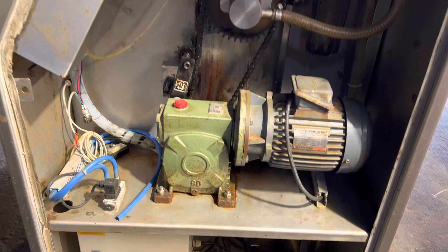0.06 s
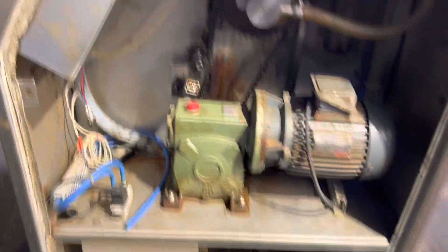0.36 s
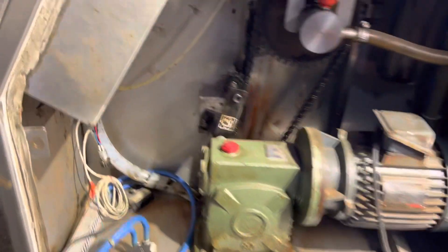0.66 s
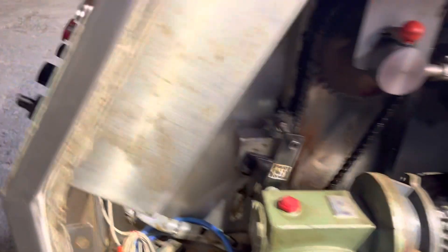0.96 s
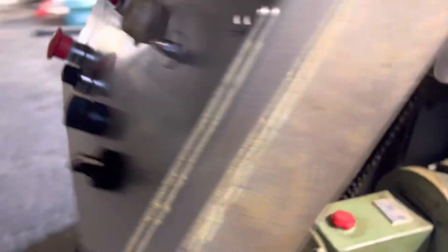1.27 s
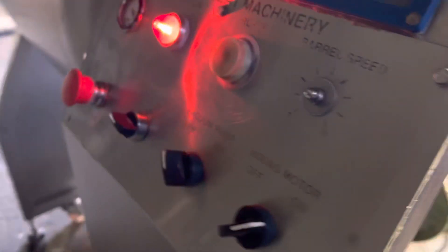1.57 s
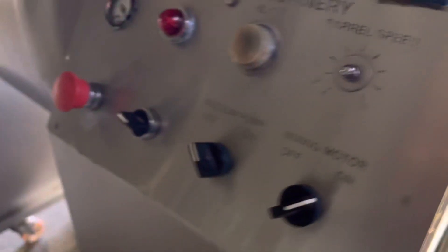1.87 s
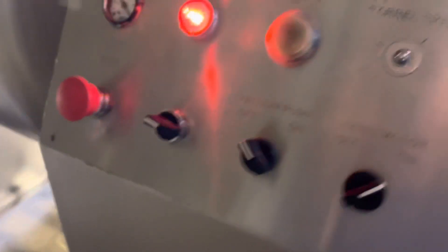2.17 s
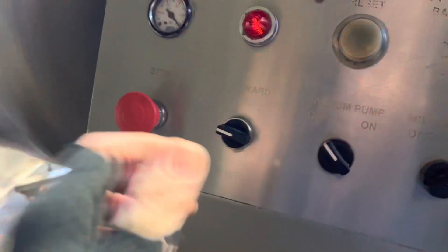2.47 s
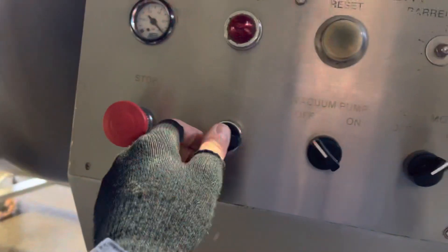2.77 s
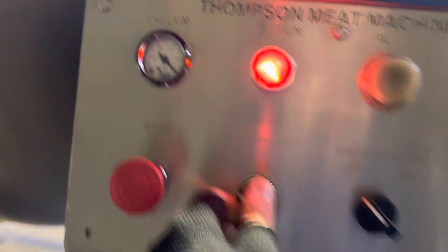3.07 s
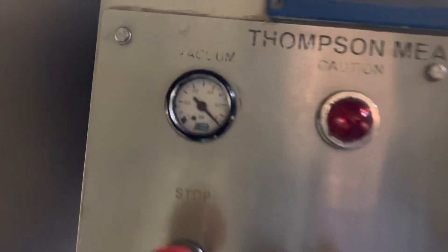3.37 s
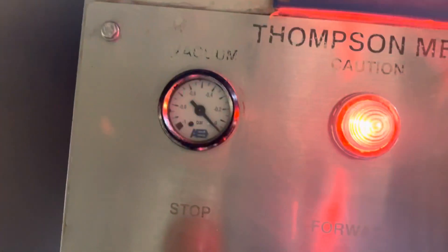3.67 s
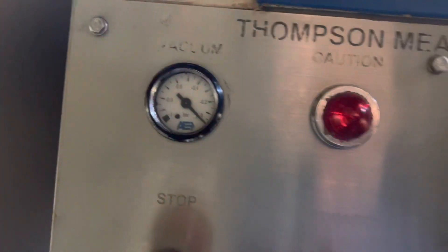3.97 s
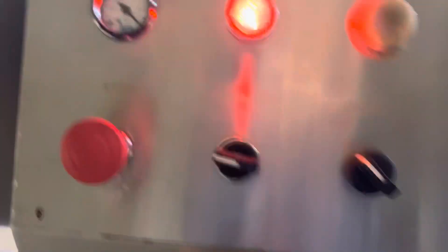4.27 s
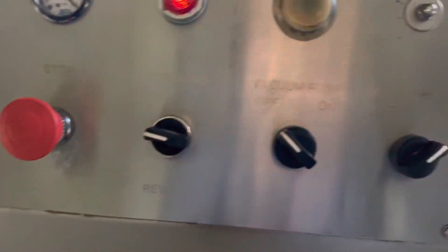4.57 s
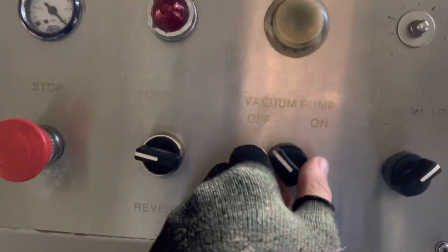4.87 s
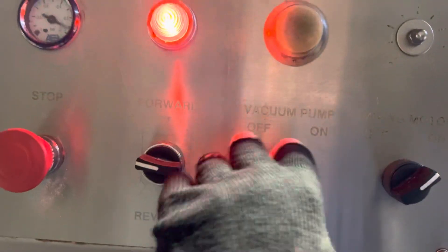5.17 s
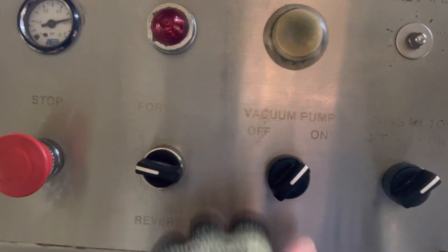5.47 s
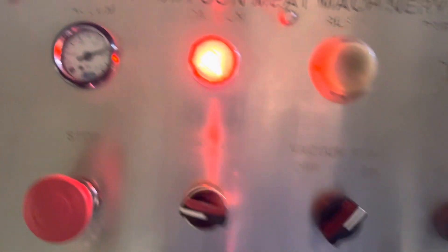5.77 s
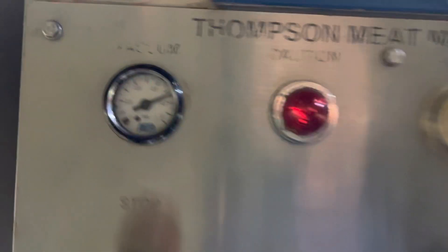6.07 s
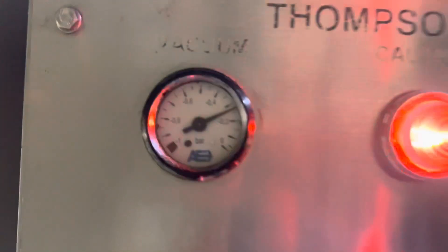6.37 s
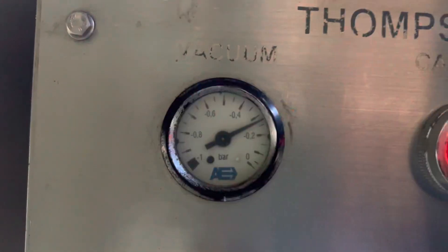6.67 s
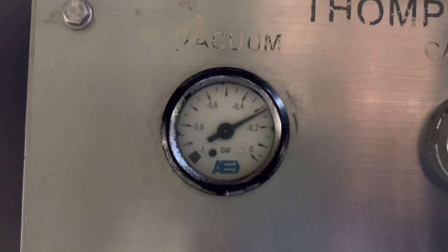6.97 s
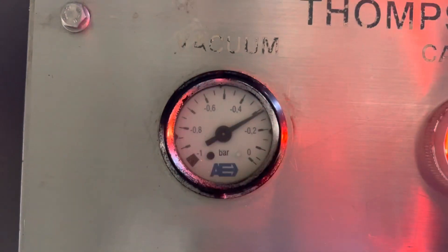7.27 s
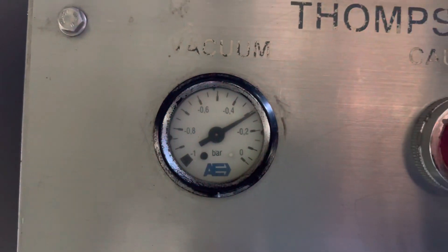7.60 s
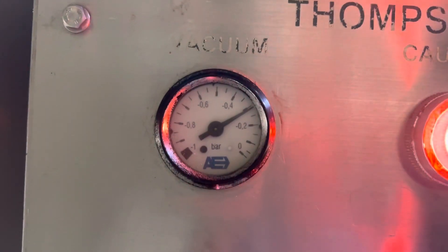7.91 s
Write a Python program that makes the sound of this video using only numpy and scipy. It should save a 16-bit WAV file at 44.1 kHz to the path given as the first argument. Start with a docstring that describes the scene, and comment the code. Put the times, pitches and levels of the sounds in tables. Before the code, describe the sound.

From the start, an electric motor gives a thin, very high whine over the hum and rumble of a gearbox, heard close to the open bay of a steel machine. Soft knocks from the chain and drum come between about 0.6 and 1.8 seconds. By 2 seconds the whine has faded well back as the microphone moves to the control panel, while the low hum carries on. A glove scrapes faintly around 2.5 seconds, followed by a light handling tap and quiet sleeve swishes. Just before 5 seconds a rotary switch ticks, then snaps over sharply at about 5.1 as a vacuum pump starts with a thump that shakes the cabinet. The pump churns and hisses, its bright rasp jumping in level near 5.8 seconds. From about 6.3 it holds a loud rasping drone with a slight squeal until the end, near 8 seconds.

```python
"""A phone's two microphones, carried from the open drive bay of a steel vacuum tumbler to its panel.
Close to the bay, the inverter-fed motor whines near 9 kHz over the hum and knocks of gearbox and chain.
By 2 s the door screens the whine; a glove scrapes and a sleeve swishes as the arm comes up.
Around 5 s, at the panel, a rotary switch clicks over and a vane pump starts with a jolt.
Its puffs ring the housing and build to a loud rasping drone as the vacuum takes hold."""
import sys
import numpy as np
from scipy import signal
from scipy.fft import rfft, irfft, next_fast_len
from scipy.io import wavfile
from scipy.ndimage import uniform_filter1d

SR = 44100
rng = np.random.default_rng(int(sys.argv[2]) if len(sys.argv) > 2 else 0)


def wav_record(signal):
    """Record a signal, one row per channel, as 16-bit PCM in the file named by sys.argv[1]."""
    frames = np.transpose(np.atleast_2d(signal))
    bounded = np.clip(frames, -1, 1)
    # unit amplitude maps onto the largest positive 16-bit level
    quanta = np.round(bounded * 32767).astype(np.int16)
    wavfile.write(sys.argv[1], SR, quanta)


N = 350154
T = np.arange(N) / SR
SIZE = 2 * next_fast_len(N // 2 + 1, True)
FREQ = np.maximum(np.arange(SIZE // 2 + 1) * SR / SIZE, 1)
PUMP_START_S, VANE_HZ = 5.1, 143.6

# How alike the two microphones hear the room. Each row: frequency in Hz, likeness (clipped to -1..1).
MIC_LIKENESS = [(60, 0.89), (150, 0.92), (300, 0.82), (640, 0.17), (1400, -0.05), (6000, 0.38),
                (7100, 0.63), (8200, 0.56), (9500, -1.11), (11000, -1.07), (11800, 0.058), (12500, .92),
                (14300, .92), (15700, -.6)]
# Their lean to the operator's side. Each row: frequency in Hz, left minus right in dB before scaling.
MIC_BIAS = [(300, -.4), (1200, -1.5), (2300, -1.5), (3400, 3), (5000, 9.5), (6400, 2), (8000, -2)]

# Gearbox rumble, gear noise, air and bearing rush, and inverter whine along the walk from the bay.
# Each row: time in seconds, level in dB.
RUMBLE_LEVEL = [(0, -58), (.35, -54), (1.1, -42.5), (1.7, -45), (3.3, -46.5), (5.0, -55.5)]
GEAR_LEVEL = [(0, -58), (.8, -54), (1.3, -52.5), (1.8, -51), (2.4, -52.5), (3.1, -53.5), (3.7, -55),
              (4.3, -54), (5.0, -57)]
RUSH_LEVEL = [(0, -55.5), (.85, -53.5), (1.3, -55.5), (1.8, -59.5), (2.3, -61.5), (3.0, -62.5), (3.6, -67),
              (5.0, -62)]
WHINE_LEVEL = [(0, -50.5), (.45, -45.5), (.7, -40.5), (1.1, -43), (1.75, -51), (2.05, -58.5), (4.8, -61),
               (7.94, -59)]
# Spectra of rumble, gears, rush, the narrow noise around the whine, and the motor's broad hiss.
# Each row: frequency in Hz, relative level in dB.
RUMBLE_SPECTRUM = [(15, -45), (25, -14), (46, 2.5), (59, 3), (135, -0.5), (167, 4), (227, -9), (260, -6.5),
                   (340, -48), (570, -120)]
GEAR_SPECTRUM = [(120, -30), (200, -5.5), (286, 2), (323, -8.5), (352, -8), (588, -6.5), (618, -8.5),
                 (636, -16.5), (760, -15), (990, -21.5), (1670, -120)]
RUSH_SPECTRUM = [(350, -12.5), (600, -12), (640, -8.5), (770, -14.5), (867, -8.5), (1020, -10.5),
                 (1740, -11), (1910, -14), (2920, -19.5), (3510, -25), (3870, -22), (5530, -29),
                 (8000, -22), (10400, -32), (12000, -29.5), (15500, -27.5)]
SKIRT_SPECTRUM = [(7000, -18), (8300, 1), (8950, 19), (9250, 8), (9600, -8), (10200, -27)]
MOTOR_HISS_SPECTRUM = [(4000, -8.5), (7000, -6), (8300, 1.5), (9000, 6), (9700, 2), (10300, -15),
                       (11300, -12), (13000, -17), (14500, -13), (15700, -5)]
# Motor and gearbox tones. Each row: pitch in Hz, level in dB at the bay, by the door, at the panel.
HUM_TONES = [(65.6, -53.5, -42.5, -59.5), (90.9, -56.5, -57, -58.5), (107.7, -51.5, -48.5, -61),
             (123.8, -56, -46, -60.5), (142.5, -52.5, -55, -61.5), (174.9, -51.5, -50.5, -61.5),
             (191.7, -52, -51.5, -57), (285.7, -56.5, -57.5, -59.5), (301.4, -70, -70, -60.5),
             (532.6, -57, -63, -72.5), (548.5, -56, -66, -86), (583, -56, -66, -66),
             (601.3, -60, -56.5, -64.5), (884, -77, -58.5, -77.5), (1144, -73, -83, -81.5),
             (1439, -70, -65, -76), (1725, -70, -77, -87), (1817, -72, -72, -78.5)]
# Resonances of the gearbox casing and bay. Each row: frequency in Hz, half-width in Hz,
# relative level in dB, time in seconds when the door starts to screen it.
CASING_MODES = [(1165, 25, -10, 0.83), (1300, 44, -6.5, 1.1), (1420, 60, -7, 1.2), (1535, 32, -5.5, 0.92),
                (1693, 19, 0.5, 0.93), (1800, 20, -10.5, 0.94), (2440, 130, -9.5, 1.7),
                (2890, 56, -7, 1.47), (3830, 130, -10.5, 1.4)]
# The inverter's switching sidebands. Each row: pitch in Hz, relative dB at the bay and at the panel.
SIDEBANDS = [(7812, -30, -32), (8010, -26.5, -29), (8267, -21, -26), (8387, -22, -26), (8480, -20, -22),
             (8551, -19, -17), (8709, -17, -17), (8769, -10, -9), (8870, 3.5, 6), (8958, -5, -6),
             (9056, -7, -11), (9155, 5, 3), (9250, -16, -16), (9312, -16, -26), (9440, -23, -28),
             (9535, -18, -27)]
# The microphones' path through the standing waves. Each row: time in seconds, distance in metres.
MIC_TRAVEL = [(0, .015), (.4, .0285), (.66, .037), (1.0, .075), (2.0, .078), (2.33, .133), (2.75, .137),
              (3.04, .152), (3.39, .19), (3.92, .193), (4.17, .228), (4.42, .247), (5.15, .266),
              (5.66, .267), (6.36, .342), (7.94, .346)]

# Fingers on the phone's case, right at the microphones. Each row: start in seconds, level in dB.
TAPS = [(.27, -42), (2.8172, -44)]
# Modes of that case. Each row: frequency in Hz, relative level in dB, 60 dB decay in seconds.
CASE_MODES = [(860, 0, .03), (1330, -9, .02)]
# Knocks of drum and chain.
# Each row: start in seconds, level in dB, treble cutoff in Hz, 60 dB decay in seconds.
KNOCKS = [(.635, -43.5, 600, 0.32), (.805, -48, 2500, 0.073), (.825, -40, 3500, 0.11),
          (1.036, -39.5, 2900, 0.15), (1.266, -45, 1800, .1), (1.643, -43, 2500, 0.15),
          (1.675, -44.5, 1200, 0.24), (1.78, -53, 1500, 0.093), (6.07, -42, 300, 0.31),
          (6.64, -37, 330, 0.25)]
# Spectrum of a knock or rattle before it is dulled. Each row: frequency in Hz, relative level in dB.
KNOCK_SPECTRUM = [(200, 4), (300, -1), (600, -9), (1200, -8.5), (2500, -17), (6000, -18)]
# Close passes by the booming cabinet. Each row: middle and half length in seconds, boost in dB.
BOOM_SWELLS = [(1.25, 0.21, 8), (3.298, 0.15, 7), (3.79, 0.24, 14)]

# Resonances of the glove's scrape. Each row: frequency in Hz, half-width in Hz, relative level in dB.
SCRAPE_BANDS = [(1250, 300, -2), (1780, 260, -4), (3100, 480, 0), (3950, 400, -4), (5800, 900, -10)]
# Arm movements. Each row: middle and half length in seconds, swish level in dB, hiss level in dB.
SWISHES = [(2.545, 0.09, -62, -64), (2.66, 0.15, -71, -65.5), (3.073, 0.21, -67.5, -71.5),
           (4.212, 0.16, -59, -65), (4.686, 0.11, -57, -61.5), (4.776, 0.067, -66.5, -60),
           (5.788, 0.14, -50, -55.5)]
# Spectra of the sleeve's swish and hiss. Each row: frequency in Hz, relative level in dB.
SWISH_SPECTRUM = [(500, -10), (900, 4), (1400, 3.5), (1780, 0.5), (2100, -2.5), (3000, -3), (3500, -1.5),
                  (3950, -1), (4400, -2.5), (6500, -7.5), (9000, -29), (15000, -77)]
SLEEVE_HISS_SPECTRUM = [(5000, -9), (8000, -1), (10300, 1), (11700, 5.5), (13500, -2), (14500, -1),
                        (15700, 2)]
# Ticks as the hand lets go of a knob. Each row: start in seconds, level in dB.
TICKS = [(3.206, -67), (3.448, -60)]
# Resonances of a tick. Each row: frequency in Hz, half-width in Hz, relative level in dB.
TICK_BANDS = [(5600, 700, 2), (7200, 900, -5)]
# Switch clicks. Each row: start in seconds, level in dB, the snap's offset in dB before its trim.
CLICKS = [(4.9405, -43, -10), (4.9472, -32, -15), (4.9857, -37.5, -6), (4.9924, -26.5, -28),
          (5.1395, -9, -9.5)]
# Modes of the switch knob. Each row: frequency in Hz, relative level in dB, 60 dB decay in seconds.
KNOB_MODES = [(1390, -7.5, 0.014), (2044, 6.5, 0.0073), (2390, -3, 0.0073), (7000, -36, 0.024)]
# Spectrum of the contacts' snap. Each row: frequency in Hz, relative level in dB.
SNAP_SPECTRUM = [(500, 9), (2500, 8.5), (4500, 4), (7500, 5.5), (10300, 3), (12500, 1), (15500, 11)]

# Jolts of the starting pump motor. Each row: start in seconds, level in dB.
JOLTS = [(5.101, -20.5), (5.1255, -20), (5.203, -31), (5.31, -36)]
# Modes of the steel cabinet. Each row: frequency in Hz, relative level in dB, 60 dB decay in seconds.
CABINET_MODES = [(61.5, -5, 0.4), (92.5, -3, 0.59), (123, 5, 0.14), (129, 0, 0.17), (216, -12.5, 0.49),
                 (368, -14, 0.11), (736, -17.5, 0.12)]
# Resonances of the pump housing, each loudest at its own stage of the vacuum.
# Each row: frequency in Hz, half-width in Hz, relative level in dB, loudest moment in seconds.
HOUSING_MODES = [(2211, 14, -9, 7.35), (2195, 106, -10.5, 6.47), (2285, 25, -12.5, 6.3),
                 (2410, 40, -11.5, 6.8), (2578, 37, -1.5, 6.97), (2616, 100, -1, 5.52),
                 (2660, 27, -2, 6.26), (2740, 66, -4, 6.86), (2968, 42, 0, 7.36), (3080, 51, 3, 7.73),
                 (3028, 60, -1, 6.63), (3136, 49, -1.5, 6.7), (3315, 65, -7, 6.4), (3390, 34, -4, 6.3),
                 (3440, 49, -7.5, 6.1), (3640, 90, -16, 6.2), (3820, 50, -11.5, 6.93)]
# The rasp leaps as the vacuum takes hold. Each row: time in seconds, level in dB.
RASP_LEVEL = [(5.22, -54.5), (5.45, -45), (5.71, -45.5), (5.85, -36), (6.04, -37), (6.26, -32.5),
              (7.0, -32), (7.42, -32), (7.6, -34), (7.94, -33)]
# The rasp's balance at the microphones. Each row: frequency in Hz, left minus right in dB.
RASP_PAN = [(2200, -2.5), (2600, -2.2), (2800, -1), (3050, 1.5), (3400, 8), (3800, 9)]
# Its delay at the right microphone. Each row: frequency in Hz, lag in milliseconds.
RASP_LAG = [(2200, -0.015), (2600, .05), (2800, 0.045), (3000, 0.093), (3800, 0.086)]
# The pump's upper resonances. Each row: frequency in Hz, half-width in Hz, relative level in dB.
OVERTONE_BANDS = [(4256, 28, 0.5), (5100, 48, 5), (5630, 45, -3.5), (5990, 50, -6), (6490, 67, 1),
                  (6880, 130, -11), (7250, 120, -4.5), (8150, 61, -7.5)]
# Spectra of the pump's churn and air hiss. Each row: frequency in Hz, relative level in dB.
CHURN_SPECTRUM = [(30, -1), (50, 11), (110, 0.5), (180, 5), (270, 8.5), (400, 1), (530, 0.5), (610, 4.5),
                  (700, -0.5), (980, 3), (1270, -1.5), (1450, 4.5), (1640, 0), (1900, 2.5), (2400, 0),
                  (3500, -5.5), (4200, -11.5), (8000, -29)]
PUMP_HISS_SPECTRUM = [(5000, 8.5), (8500, 10.5), (10000, 3), (12000, 8.2), (14500, 7.6), (15700, 13.5)]
# The pump's drone. Each row: multiple of the vane rate, level in dB.
VANE_TONES = [(1, -53), (2, -58), (3, -59), (4, -56.5)]
# The exhaust's whistle. Each row: frequency in Hz, half-width in Hz, relative level in dB.
EXHAUST_BANDS = [(3426, 30, -3.5), (3788, 19, 1.5), (3865, 12, -2)]


def undb(db):
    """Decibels to gain."""
    return 10 ** (np.asarray(db) / 20)


def unit(x):
    """Scale to rms 1."""
    return x / np.sqrt(np.mean(x ** 2))


def curve(points):
    """Join (seconds, value) points at every sample."""
    return np.interp(T, *np.transpose(points))


def across(points):
    """Join (Hz, value) points on a log-frequency axis."""
    hz, value = np.transpose(points)
    return np.interp(np.log(FREQ), np.log(hz), value)


def colour(points):
    """Gain of a spectrum that falls steeply beyond its ends."""
    low_hz, high_hz = points[0][0], points[-1][0]
    return undb(across(points)) / (1 + (low_hz / FREQ) ** 8) / (1 + (FREQ / high_hz) ** 12)


def resonances(bands):
    """Gain of a set of steep-sided resonances."""
    power = sum(undb(2 * db) / (1 + ((FREQ - hz) / width) ** 2) ** 2 for hz, width, db in bands)
    return np.sqrt(power)


def noise(gain):
    """Random noise with the given gain at each frequency."""
    return irfft(gain * (rng.standard_normal(len(FREQ)) + 1j * rng.standard_normal(len(FREQ))))[:N]


def resonant_noise(bands):
    """Noise of rms 1 ringing in the given resonances."""
    return unit(noise(resonances(bands)))


def drift(rate_hz):
    """Smooth random drift with a spread of about 1."""
    steps = rng.standard_normal(4096)
    return 1.2 * np.interp(T * rate_hz * 2, np.arange(len(steps)), steps)


def tone(hz, scatter, rate_hz):
    """A tone of rms 1 whose reflections add up differently as things move."""
    phase = 2 * np.pi * (np.cumsum(hz * np.ones(N)) / SR + rng.random())
    in_phase = (1 + scatter * drift(rate_hz)) * np.cos(phase)
    return unit(in_phase + scatter * drift(rate_hz) * np.sin(phase))


def ring(modes, start, rise):
    """Decaying modes after a push that builds up over rise seconds."""
    first = int(np.ceil(start * SR))
    t = np.maximum(T[:SR] + first / SR - start, 0)
    ringing = sum(undb(db - 60 * t / t60) * np.sin(2 * np.pi * hz * t) for hz, db, t60 in modes)
    out = np.zeros(N)
    out[first:first + SR] = ringing * (1 - np.exp(-(t / rise) ** 2))
    return out


def burst(start, t60):
    """An envelope that jumps up and falls 60 dB in t60 seconds."""
    return (T >= start) * undb(-60 * np.maximum(T - start, 0) / t60)


def bump(start, t60, rise):
    """An envelope that swells over rise seconds and dies away."""
    return burst(start, t60) * np.clip((T - start) / rise, 0, 1)


def swell(middle_s, half_s):
    """A bell-shaped envelope that peaks at 1."""
    return np.exp(-((T - middle_s) / half_s) ** 2)


def settle(start, from_db, to_db, lag_s):
    """A level that holds until start, then closes in exponentially on to_db."""
    return to_db + (from_db - to_db) * np.exp(-np.maximum(T - start, 0) / lag_s)


def diffuse(gain, bias=0.67):
    """Normalised noise from all round; the microphones agree in the bass, only in places higher up."""
    likeness = np.clip(across(MIC_LIKENESS), -1, 1)
    mid, side = noise(gain * np.sqrt(1 + likeness)), noise(gain * np.sqrt(1 - likeness))
    lean = undb(np.outer([.5, -.5], bias * across(MIC_BIAS)))
    lean /= np.sqrt(np.mean(lean ** 2, axis=0))
    return irfft(rfft([mid + side, mid - side], SIZE) * lean)[:, :N] / np.std(mid)


def place(x, lag_ms, pan_db):
    """Direct sound; positive values make it later and softer at the right microphone."""
    bins = rfft(x, SIZE)
    late = bins * np.exp(-2j * np.pi * FREQ * lag_ms / 1000)
    return np.array([irfft(bins * undb(pan_db / 2))[:N], irfft(late * undb(-pan_db / 2))[:N]])


def room(x, t60):
    """Dense reflections from steel and concrete, different at each microphone."""
    t = T[:SR // 2]
    tail = rng.standard_normal((2, len(t))) * undb(-60 * t / t60) * (t > .003)
    return signal.fftconvolve(x[None], tail / np.sqrt(np.sum(tail[0] ** 2)), axes=1)[:, :N]


def drive(chain_hz=4.85, link_s=3.0, chain_db=-54, boom_db=-55):
    """Gearbox rumble and hum from the open bay; the chain grumbles as each link seats on the sprocket."""
    passing_s = [.74, 1.12, 2.1]  # at the bay, by the door, at the panel
    hum = sum(undb(np.interp(T, passing_s, levels)) * tone(hz, scatter=0.43, rate_hz=3 + hz / 200)
              for hz, *levels in HUM_TONES)
    seating = (.5 + .5 * np.cos(2 * np.pi * chain_hz * (T - link_s))) ** 2
    grumble = diffuse(resonances([(346, 26, -0.13), (465, 45, -1.4)]))
    chain = grumble * seating * undb(chain_db + 1.5 * drift(4))
    rumble = diffuse(colour(RUMBLE_SPECTRUM)) * undb(curve(RUMBLE_LEVEL) - 1)
    close_db = sum(db * swell(middle, half) for middle, half, db in BOOM_SWELLS)
    boom = diffuse(resonances([(160.3, 6.9, 0)])) * undb(boom_db + close_db)
    gears = diffuse(colour(GEAR_SPECTRUM)) * undb(curve(GEAR_LEVEL) + 1.5)
    rush = diffuse(colour(RUSH_SPECTRUM)) * undb(curve(RUSH_LEVEL) + 0.81 * drift(12))
    return hum + chain + rumble + boom + gears + rush


def gear_casing(level_db=-59, echo_db=-5, screened_db=-17, throb_hz=4.4, throb_db=0.5, grit_db=1.36):
    """The casing rings with the gritty mesh and throbs with the chain, fading behind the door."""
    waver_db = throb_db * np.cos(2 * np.pi * throb_hz * T) + grit_db * drift(35)
    casing = sum(resonant_noise([(hz, width, 0)]) * undb(settle(start, db, db + screened_db, lag_s=0.39))
                 for hz, width, db, start in CASING_MODES)
    direct = place(casing, lag_ms=0.082, pan_db=-1.5)
    echo = room(casing, t60=0.033) * undb(echo_db)
    return (direct + echo) * undb(level_db + waver_db)


def standing_wave(reflection=.45, node_spacing_m=.019):
    """The whine meets its reflection off the steel, so it fades and swells as the microphones move."""
    phase = 2 * np.pi * curve(MIC_TRAVEL) / node_spacing_m
    return unit(np.abs(1 + reflection * np.exp(1j * phase)))


def inverter(tone_db=5, hiss_db=-17, motor_distance_m=0.194, sound_m_s=343):
    """The motor windings sing at the switching sidebands, a touch sharp on approach, flat on leaving."""
    level = undb(curve(WHINE_LEVEL))
    screened = np.interp(T, [1.3, 2.0], [0, 1])  # the door comes between motor and microphones
    # level goes as 1 / distance, so its slope gives the speed of approach
    approach_m_s = motor_distance_m * uniform_filter1d(np.gradient(np.log(level)) * SR, size=SR // 4)
    doppler = 1 + approach_m_s / sound_m_s + 0.00019 * drift(3)
    whine = unit(sum(undb(bay + (panel - bay) * screened) * tone(hz * doppler, scatter=0.18, rate_hz=4)
                     for hz, bay, panel in SIDEBANDS))
    skirt = unit(noise(colour(SKIRT_SPECTRUM))) * undb(-9 - 6 * screened)
    direct = place(undb(tone_db) * whine + skirt, lag_ms=0.038, pan_db=0)
    hiss = diffuse(colour(MOTOR_HISS_SPECTRUM)) * undb(hiss_db)
    return (direct * standing_wave() + hiss) * level


def case_taps():
    """Handling noise: a finger bumps the phone's case and pushes the two microphones opposite ways."""
    taps = sum(undb(db) * ring(CASE_MODES, start, rise=.0005) for start, db in TAPS)
    return np.array([taps, -taps])


def drum_knocks():
    """The drum and its chain bump softly now and then."""
    knocks = 0
    for start, db, cutoff_hz, t60 in KNOCKS:
        thud = diffuse(colour(KNOCK_SPECTRUM) / (1 + (FREQ / cutoff_hz) ** 2))
        knocks += thud * bump(start, t60, rise=0.0046) * undb(db)
    return knocks


def glove(start=2.435, level_db=-56, grit_db=2):
    """The knitted glove catches on the cuff and scrapes free with a gritty flutter."""
    scrape = diffuse(resonances(SCRAPE_BANDS)) * bump(start, t60=0.47, rise=0.018)
    return scrape * undb(level_db + grit_db * drift(110))


def sleeve():
    """Within arm's reach of the microphones, cloth slides over cloth at each movement."""
    swish_level, hiss_level = 0, 0
    for middle, half, swish_db, hiss_db in SWISHES:
        speed = swell(middle, half)
        swish_level += speed * undb(swish_db)
        hiss_level += speed * undb(hiss_db)
    swish = swish_level * diffuse(colour(SWISH_SPECTRUM), bias=1.4)
    hiss = hiss_level * diffuse(colour(SLEEVE_HISS_SPECTRUM))
    return (swish + hiss) * undb(drift(40))


def finger_ticks():
    """A finger slips off a knob with a tiny bright tick."""
    return diffuse(resonances(TICK_BANDS)) * sum(undb(db) * burst(s, t60=.015) for s, db in TICKS)


def switch(snap_trim_db=-7, knob_room_db=-18, snap_room_db=-10):
    """At the panel, to the right, the cam ticks along and snaps over; the plastic knob rings briefly."""
    knob, snap_level = 0, 0
    for start, db, snap_db in CLICKS:
        knob += undb(db) * ring(KNOB_MODES, start, rise=0.00065)
        decay = burst(start, t60=0.0062) + undb(snap_room_db) * burst(start, t60=0.098)
        snap_level += undb(db + snap_db + snap_trim_db) * decay
    echo = room(knob, t60=0.11) * undb(knob_room_db)
    return place(knob, lag_ms=0, pan_db=-6) + echo + snap_level * diffuse(colour(SNAP_SPECTRUM))


def jolt(shudder_db=-31, rattle_db=-37, dull_hz=1300):
    """The pump's starting torque shakes the cabinet, and its loose panels shudder on."""
    boom = sum(undb(db) * ring(CABINET_MODES, start, rise=0.0095) for start, db in JOLTS)
    shudder = diffuse(resonances([(hz, hz / 5, db) for hz, db, _ in CABINET_MODES]))
    shudder *= bump(5.11, t60=1.0, rise=0.014) * undb(shudder_db)
    rattle = diffuse(colour(KNOCK_SPECTRUM) / np.hypot(1, FREQ / dull_hz) ** .5)
    rattle *= bump(5.098, t60=0.46, rise=0.0097) * undb(rattle_db)
    return place(boom, lag_ms=-0.36, pan_db=0) + shudder + rattle


def pump_housing(stage_half_s=0.67, off_stage_db=-7.5, waver_db=.6):
    """The housing's ring at a steady level; its resonances take turns as the vacuum builds."""
    rings, power = 0, 0
    for hz, width, db, loudest_s in HOUSING_MODES:
        off_stage = 1 - swell(loudest_s, stage_half_s)
        gain = undb(db + off_stage_db * off_stage + waver_db * drift(5))
        rings += resonant_noise([(hz, width, 0)]) * gain
        power += gain ** 2
    return rings / np.sqrt(power)


def pump(sag_hz_per_s=.1, puff_depth=0.05, flutter_db=0.8, squeal_db=-36, echo_db=-8, boom_db=-50):
    """Heard from the panel, each vane's puff rings the housing; the rasp grows as the vacuum builds."""
    running = np.clip((T - PUMP_START_S) / 0.022, 0, 1)
    spin_up = 1 - burst(PUMP_START_S, t60=.25)
    loaded_hz = VANE_HZ - sag_hz_per_s * (T - PUMP_START_S)  # the growing load slows the pump
    vane_hz = loaded_hz * spin_up * (1 + 0.00046 * drift(5.1))
    vane_phase = 2 * np.pi * np.cumsum(vane_hz) / SR
    puffs = (1 + puff_depth * np.cos(vane_phase)) * undb(flutter_db * drift(57))
    rasp_db = curve(RASP_LEVEL)
    rasp = unit(pump_housing() * puffs) * undb(rasp_db + 1)
    # the vane tips start to squeal once the vacuum is high
    squealing = np.clip((T - 5.95) / 1.33, 0, 1)
    squeal = tone(21 * vane_hz, scatter=0.45, rate_hz=14) * undb(squeal_db) * squealing
    churn_db = settle(PUMP_START_S, from_db=-50.5, to_db=-42.5, lag_s=0.25)
    overtone_db = 0.84 * churn_db + 0.16 * rasp_db - 12.2
    overtones = unit(noise(resonances(OVERTONE_BANDS)) * puffs) * undb(overtone_db)
    direct = place(rasp + squeal, across(RASP_LAG), across(RASP_PAN))
    direct += place(overtones, lag_ms=0.042, pan_db=6)
    # the walls return the same ring with the puffs smoothed out
    echo = room(rasp + overtones, t60=0.34) * undb(echo_db)
    churn = diffuse(colour(CHURN_SPECTRUM), bias=0.6) * undb(churn_db)
    boom = diffuse(resonances([(163.0, 9.6, 0)])) * undb(boom_db)
    hiss_db = settle(PUMP_START_S, from_db=-57, to_db=-59, lag_s=0.12)
    thin_air_db = -3.2 * np.maximum(T - 6.7, 0)  # the hiss eases once the air thins
    hiss = diffuse(colour(PUMP_HISS_SPECTRUM), bias=1.1) * undb(hiss_db + thin_air_db)
    drone = sum(undb(db) * tone(k * vane_hz, scatter=0.29, rate_hz=5) for k, db in VANE_TONES)
    return (direct + echo + churn + boom + hiss + drone) * running


def exhaust(start=5.2, whistle_db=-50, surge_db=-57, steady_db=-60):
    """The first rush of air whistles in the exhaust, off left, and brings out the eighth vane tone."""
    whistle = place(resonant_noise(EXHAUST_BANDS), lag_ms=0.33, pan_db=14)
    whistle *= bump(start, t60=9.3, rise=0.44) * undb(whistle_db)
    hum_level = bump(start, t60=5, rise=0.11) * undb(surge_db) + (T > start) * undb(steady_db)
    hum = tone(8 * VANE_HZ, scatter=0.15, rate_hz=4.3) * hum_level
    return whistle + place(hum, lag_ms=-0.17, pan_db=-1.5)


def scene():
    """The walk from bay to panel, as it reaches the two microphones."""
    from_the_bay = drive() + gear_casing() + inverter() + case_taps() + drum_knocks()
    at_the_panel = glove() + sleeve() + finger_ticks() + switch()
    return from_the_bay + at_the_panel + jolt() + pump() + exhaust()


def record(dry, top_hz=15800):
    """The phone cuts the top treble steeply."""
    return signal.sosfilt(signal.ellip(8, .2, 70, top_hz, fs=SR, output="sos"), dry)


dry = scene()
out = record(dry)
wav_record(out)
```